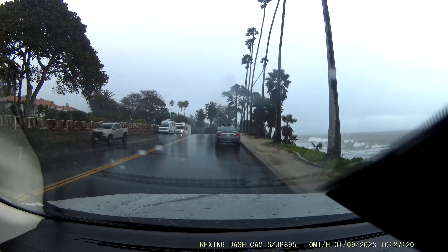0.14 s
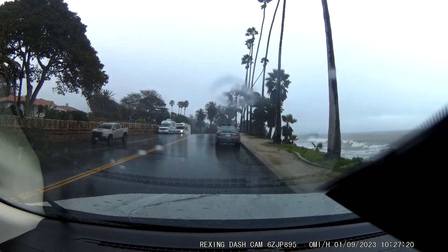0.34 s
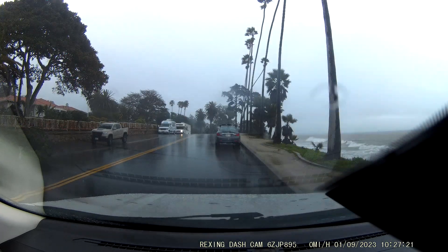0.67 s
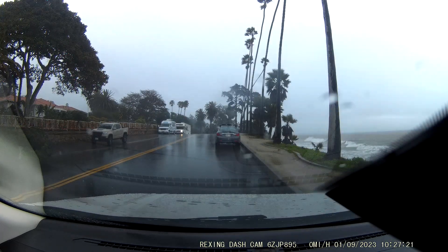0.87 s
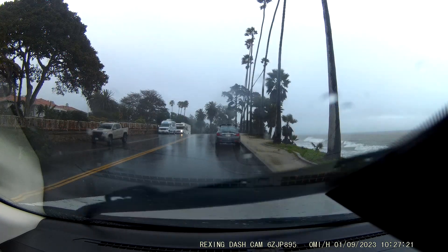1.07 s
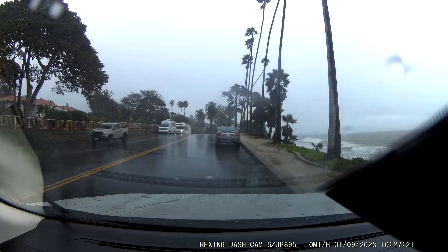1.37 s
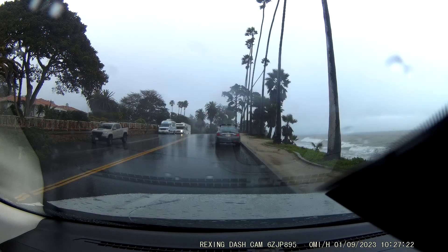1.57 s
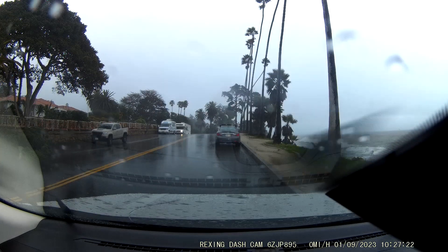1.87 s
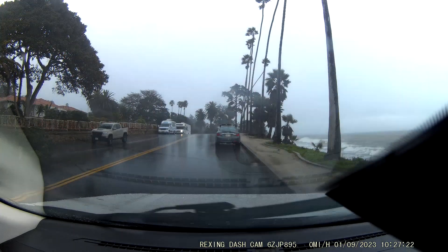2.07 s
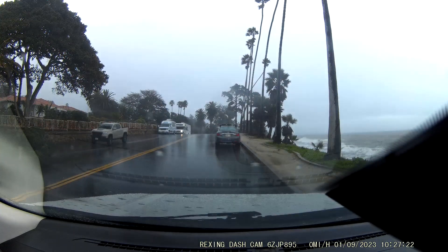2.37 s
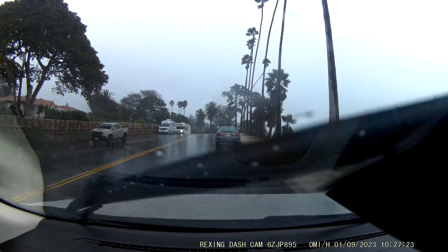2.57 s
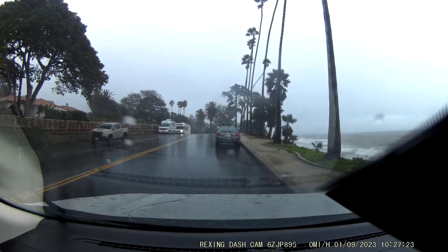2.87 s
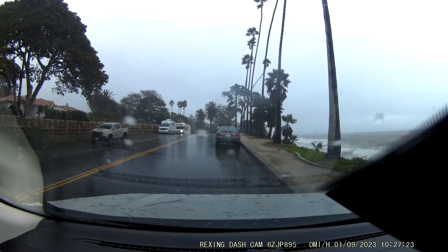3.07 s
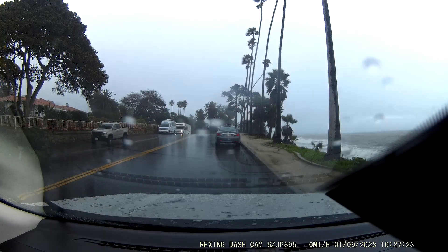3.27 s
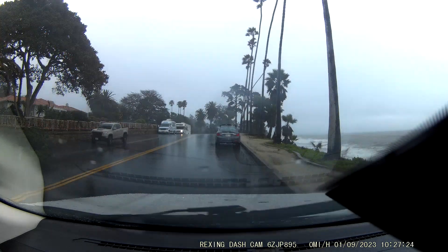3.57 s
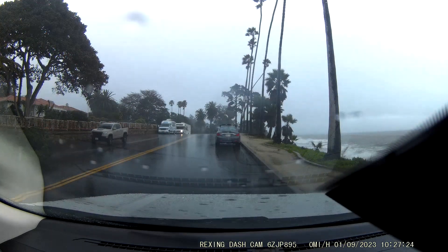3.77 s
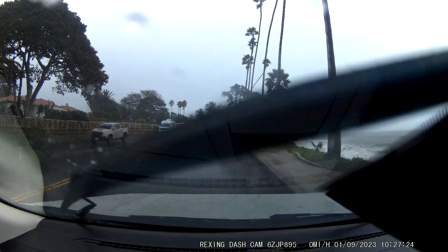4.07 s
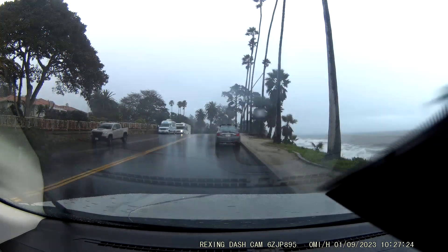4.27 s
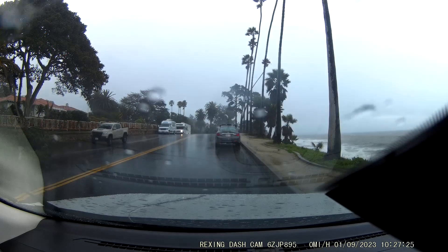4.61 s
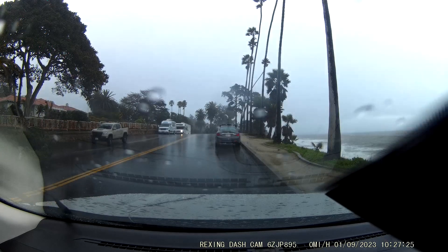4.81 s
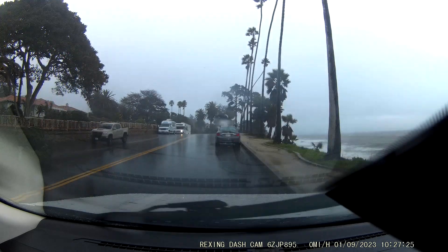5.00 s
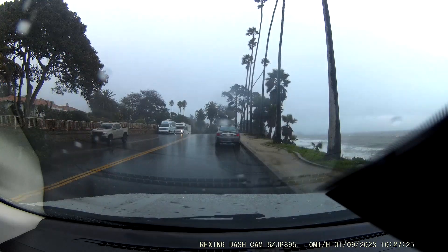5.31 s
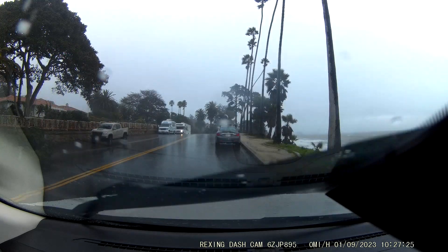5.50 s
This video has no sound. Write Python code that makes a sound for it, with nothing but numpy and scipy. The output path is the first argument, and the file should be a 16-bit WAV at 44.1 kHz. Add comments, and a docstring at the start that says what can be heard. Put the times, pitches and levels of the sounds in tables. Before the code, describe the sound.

Inside an idling car in rain, drops tick on the windscreen over a deep engine hum while wipers knock and softly flop.

```python
"""Inside an idling car in the rain: drops tick on the windscreen and patter on the roof, over a deep engine hum.
The wipers sweep about every 1.5 s with a faint motor whirr: they rub up the glass, knock at the top turn and
flop softly at the bottom. Now and then a fat drop splashes, thuds on the roof or rings a panel.
Rain, rubbing and hiss are filtered noise; hum and whirr are wavering sines; knocks are damped modes and bursts.
A bright hiss swells at the end."""
import sys
import numpy as np
from scipy import signal
from scipy.fft import rfft, irfft, next_fast_len
from scipy.io import wavfile
from scipy.ndimage import map_coordinates

SR = 44100
rng = np.random.default_rng(int(sys.argv[2]) if len(sys.argv) > 2 else 0)


def log_audio(samples):
    """Write samples as a 16-bit WAV file to the path given in sys.argv[1]."""
    # one column per channel
    frames = np.atleast_2d(samples).T
    # limit to full scale, then quantise
    limited = np.clip(frames, -1, 1)
    pcm = np.round(limited * 32767).astype(np.int16)
    wavfile.write(sys.argv[1], SR, pcm)


N = 249165  # length in samples

# How hard it rains. Each row: time in seconds, strength in dB.
RAIN_STRENGTH = [(0.0, -58.5), (0.28, -59.5), (1.41, -53.5), (2.01, -58), (2.5, -55.5), (4.04, -57),
                 (4.71, -54.5), (5.24, -57.5), (5.65, -54.5)]
# Spectra of a drop's tick on the glass, of water slapping the glass and of a dull thud.
# Each row: frequency in Hz, relative level in dB.
TICK_SPECTRUM = [(900, -4), (2300, -12), (2800, 2.5), (3200, 12.5), (4500, 0), (5000, -10), (5600, -8),
                 (7000, -21.5), (9000, -21), (15000, -32)]
SPLASH_SPECTRUM = [(300, -16), (800, -1), (1100, 5), (1600, -6), (2200, -15.5), (3200, -8.5), (5300, -16),
                   (7500, -27.5), (15000, -54)]
THUD_SPECTRUM = [(100, -7), (200, -7), (350, 6.5), (500, -8.5), (800, -18), (1500, -22), (4000, -45),
                 (15000, -65)]


def amp(db):
    """Decibels to gain."""
    return 10 ** (np.asarray(db) / 20)


def unit(x):
    """Scale to rms 1."""
    return x / np.sqrt(np.mean(x ** 2) + 1e-20)


def seconds(count):
    """A time axis in seconds."""
    return np.arange(count) / SR


def curves(rows):
    """One value per sample for each column after the time."""
    s, *cols = np.transpose(rows)
    return [np.interp(seconds(N), s, c) for c in cols]


def wobble(rate):
    """A smooth random curve through rate knots a second."""
    knots = rng.standard_normal(int(N * rate / SR) + 4)
    return map_coordinates(knots, [seconds(N) * rate])


def bump(s, width):
    """A bell-shaped swell of height 1 around time s."""
    return np.exp(-((seconds(N) - s) / width) ** 2)


def colour(x, spectrum):
    """Causal minimum-phase filter through the given (Hz, dB) points, made by folding the cepstrum."""
    size = 2 * next_fast_len(len(x) // 2 + 4096)
    hz, db = np.transpose(spectrum)
    log_hz = np.log(np.fft.rfftfreq(size, 1 / SR) + 1)
    gain = amp(np.interp(log_hz, np.log(hz), db))
    cepstrum = irfft(np.log(gain))
    cepstrum[1:size // 2] *= 2
    cepstrum[size // 2 + 1:] = 0
    response = np.exp(rfft(cepstrum))
    return irfft(rfft(x, size) * response)[:len(x)]


def noise(spectrum, count=N):
    """Coloured noise of rms 1."""
    return unit(colour(rng.standard_normal(count), spectrum))


def add(track, s, sound):
    """Mix a sound into a track at time s."""
    room = track[max(round(s * SR), 0):][:len(sound)]
    room += sound[:len(room)]


def ring(modes, attack):
    """Damped sine modes (Hz, dB, t60 in s), struck at slightly new strengths each time."""
    t = seconds(SR // 2)
    tones = np.zeros(len(t))
    for hz, db, t60 in modes:
        strike_db = db + .5 * rng.standard_normal()
        tones += amp(strike_db - 60 * t / t60) * np.sin(2 * np.pi * hz * t)
    return tones * (1 - np.exp(-t / attack))


def splat(spectrum, t60, wet):
    """An impact of peak 1: a sharp click and a short fizz of bursting water."""
    t = seconds(SR // 20)
    force = rng.standard_normal(len(t)) * amp(-60 * t / t60)
    force *= wet / np.linalg.norm(force)
    force[0] += 1  # the click
    burst = colour(force, spectrum)
    return burst / np.abs(burst).max()


def shower(spectrum, rate, spread_db, t60):
    """Countless random splats, mostly small, of rms 1: noise follows the summed power of their decays."""
    falls = rng.random(N) < rate / SR
    sizes = amp(spread_db * np.minimum(rng.exponential(size=N), 4.5))
    decay = amp(-60 * seconds(SR // 10) / t60)
    power = signal.fftconvolve(falls * sizes ** 2, decay ** 2)[:N]
    return unit(colour(np.sqrt(np.abs(power)) * rng.standard_normal(N), spectrum))


def clicks(spectrum, rate, spread_db):
    """Separate clean clicks at random moments and sizes, of rms 1."""
    falls = rng.random(N) < rate / SR
    sizes = amp(spread_db * np.clip(rng.standard_normal(N), -2, 1.5))
    return unit(colour(falls * sizes, spectrum))


def engine():
    """The idle's firing tone, a wavering sine, fills the cabin over a soft rumble of low noise."""
    # Each row: frequency in Hz, relative level in dB.
    rumble_spectrum = [(15, -4), (30, 3), (45, -4.5), (65, 0.5), (110, -7), (200, -9), (270, -15.5),
                       (500, -26), (1500, -60), (15000, -101)]
    firing_hz, waver_db, heave_db = 30.02, .6, 1.3
    phase = 2 * np.pi * np.cumsum(firing_hz + 0.099 * wobble(3.0)) / SR
    hum = amp(-37.5 + waver_db * wobble(5.25)) * np.sin(phase)
    rumble = amp(-46 + heave_db * wobble(4.62)) * noise(rumble_spectrum)
    return hum + rumble


def late_hiss():
    """A bright hiss, coloured noise, swells at the end and then holds its level."""
    # Each row: frequency in Hz, relative level in dB.
    hiss_spectrum = [(2000, -12), (4500, 11), (7000, -3), (10500, 0), (15000, -19)]
    top_s, top_db, rise_db_per_s = 5.64, -55.5, 120
    level_db = top_db + rise_db_per_s * np.minimum(seconds(N) - top_s, 0)
    return amp(level_db) * noise(hiss_spectrum)


def rain():
    """One strength drives fine patter and ticks on the glass and duller drumming through the lined roof."""
    # Fine patter on the glass, drumming on the roof. Each row: frequency in Hz, relative level in dB.
    patter_spectrum = [(700, -14), (1500, 4.5), (2200, -2.5), (2700, 0), (3200, -2), (4200, -4.5),
                       (4900, -4), (5500, -2.5), (7000, -15.5), (8300, -15.5), (10000, -19.5),
                       (15000, -27.5)]
    drumming_spectrum = [(150, -10.5), (300, 1), (375, 4.5), (450, -3), (540, 1), (680, 3.5), (900, 2),
                         (1100, -3), (1550, -10.5), (2100, -22), (4000, -37.5)]
    patter_db, fine_ticks_db = 1, -9  # re the rain's strength
    mean_roof_db, roof_follows, roof_waver_db = -47.8, .25, 0.55  # the roof takes a share of the rain's swings
    rain_db, = curves(RAIN_STRENGTH)
    roof_db = mean_roof_db + roof_follows * (rain_db - rain_db.mean()) + roof_waver_db * wobble(3.93)
    patter = amp(rain_db + patter_db) * shower(patter_spectrum, rate=2500, spread_db=2.5, t60=0.012)
    ticks = amp(rain_db + fine_ticks_db) * clicks(TICK_SPECTRUM, rate=60, spread_db=3.5)
    roof = amp(roof_db) * shower(drumming_spectrum, rate=700, spread_db=0.5, t60=0.052)
    return patter + ticks + roof


def drop(db, body_db):
    """One drop on the windscreen: a bright tick over a duller body, both short splats."""
    # The duller body. Each row: frequency in Hz, relative level in dB.
    body_spectrum = [(300, -20), (850, 4), (1600, 8), (2100, -4.5), (2700, -0.5), (5000, -28), (7000, -27),
                     (15000, -31)]
    tick_trim_db, body_trim_db = -0.5, 7  # added to the two parts of every drop
    pitch = rng.uniform(.96, 1.1)  # each tick is pitched slightly differently, at random
    tick_spectrum = np.multiply(TICK_SPECTRUM, [pitch, 1])
    tick = amp(tick_trim_db) * splat(tick_spectrum, t60=0.011, wet=.35)
    body = amp(body_db + body_trim_db) * splat(body_spectrum, t60=0.013, wet=0.61)
    return amp(db) * (tick + body)


def small_drops():
    """Smaller drops hit the windscreen at random, harder when the rain is stronger."""
    per_s, mean_db, spread_db, body_db = 8, -41.5, 3.5, -11
    out = np.zeros(N)
    rain_db, = curves(RAIN_STRENGTH)
    for place, size in rng.random((round(per_s * N / SR), 2)):
        swing_db = rain_db[int(place * N)] - rain_db.mean()
        db = mean_db + spread_db * (2 * size - 1) + .5 * swing_db
        add(out, place * N / SR, drop(db, body_db))
    return out


def near_drops():
    """Large drops tick on the windscreen, ring a panel's modes, splash, or thud on the roof."""
    # The largest drops on the glass, each heard 1 ms after its listed time.
    # Each row: time in seconds, drop level in dB, body in dB re that level, before the trims in drop().
    large_drops = [(0.1715, -37, -8), (0.2992, -39, -12), (0.3135, -38, -13), (1.1867, -29, -8.5),
                   (1.278, -37, -20), (1.646, -35, -12), (1.9107, -37.5, -11), (2.3236, -35, -14),
                   (2.454, -38, -11), (2.799, -37, -15), (3.061, -35, -15), (3.175, -37.5, -13),
                   (3.2873, -35, -17), (3.5578, -34, -14), (3.968, -35.5, -6), (4.0248, -36.5, -10),
                   (4.6893, -37, -12), (4.7366, -35.5, -13), (4.9697, -38, -10), (5.114, -36.5, -8),
                   (5.126, -36, -13), (5.2367, -39, -9), (5.2614, -35, -8)]
    # Fat drops ringing a panel. Each row: start in seconds, level in dB.
    plops = [(4.3288, -41), (4.3332, -35.5)]
    # The panel's modes. Each row: frequency in Hz, level in dB, 60 dB decay time in seconds.
    panel_modes = [(1230, 4.5, 0.064), (1334, -2, 0.067), (1390, -4, 0.064), (1530, -16, 0.13)]
    # Heavy drips on the lined roof. Each row: start in seconds, peak level in dB.
    roof_drips = [(0.081, -36), (0.649, -38.5), (2.547, -39), (5.063, -36)]
    # Water slapping the glass. Each row: centre in seconds, level in dB.
    splashes = [(3.042, -48), (3.061, -39.5)]
    out = np.zeros(N)
    for s, db, body_db in large_drops:
        add(out, s + 0.00099, drop(db, body_db))
    for s, db in plops:
        add(out, s, amp(db) * ring(panel_modes, attack=0.00018))
    for s, db in roof_drips:
        add(out, s, amp(db) * splat(THUD_SPECTRUM, t60=0.14, wet=1.5))
    slaps = sum(amp(db) * bump(s, width=0.0078) for s, db in splashes)
    return out + slaps * noise(SPLASH_SPECTRUM)


def wiper_motor():
    """A rough gear whirr: a sine that wanders a little in pitch and level, roughened by fast wobbles."""
    motor_hz, wander_hz, level_db, waver_db = 804, 10, -55, 1.6
    phase = 2 * np.pi * np.cumsum(motor_hz + wander_hz * wobble(8)) / SR
    whirr = unit((0.69 + wobble(50)) * np.sin(phase) + wobble(50) * np.cos(phase))
    return amp(level_db + waver_db * wobble(5.2)) * whirr


def thump(hz, width):
    """A soft push on the glass, a cycle or two long; it sinks in pitch to hz as the rubber settles."""
    u = seconds(SR // 5) / width
    phase = 2 * np.pi * hz * width * (u + 2 * (1 - np.exp(-u)))
    return u ** 2 * np.exp(2 - 2 * u) * np.sin(phase)


def wiper_flops():
    """At the bottom the wet blades tap, scuff and flop over, rest, and shudder as they set off again."""
    # Blades flopping over. Each row: start in seconds, first tap in dB, restart shake in dB.
    flops = [(0.879, -34, -40), (2.342, -32, -39), (3.8238, -26, -42), (5.296, -33, -38.5)]
    # Rubber scuffing the glass, arms shuddering. Each row: frequency in Hz, relative level in dB.
    scuff_spectrum = [(70, -9), (170, 10), (270, 0.5), (370, 4.5), (460, -3.5), (560, -1.5), (800, -12.5),
                      (1150, -8.5), (1700, -21), (5000, -37), (15000, -56)]
    shudder_spectrum = [(35, -16), (55, -2), (80, 2), (110, -9), (200, -18), (400, -32), (2000, -73)]
    flop_lag_s, scuff_db, scuff_width_s = 0.0182, -35, 0.019  # the scuff and thump follow the tap
    thump_db, shake_db, shake_lag_s, shake_width_s = -26, -38.5, .05, 0.072  # the arms land and shake
    rest_s, restart_width_s = .205, 0.07  # the arms rest, then set off again
    restart_thump_db, restart_rub_db = 3.5, -9.5  # re the restart's shake
    out, rub, shake = np.zeros(N), np.zeros(N), np.zeros(N)
    for s, tap_db, restart_db in flops:
        add(out, s, amp(tap_db) * splat(scuff_spectrum, t60=0.057, wet=0.58))
        add(out, s + flop_lag_s, amp(thump_db) * thump(hz=43.5, width=0.015))
        restart_thump = amp(restart_db + restart_thump_db) * thump(hz=47.9, width=0.0195)
        add(out, s + rest_s - .02, restart_thump)
        restart = amp(restart_db) * bump(s + rest_s, restart_width_s)
        rub += amp(scuff_db) * bump(s + flop_lag_s, scuff_width_s)
        rub += amp(restart_rub_db) * restart
        shake += amp(shake_db) * bump(s + shake_lag_s, shake_width_s) + restart
    return out + rub * noise(scuff_spectrum) + shake * noise(shudder_spectrum)


def rattle():
    """The loose wiper arm rattles: a rough burst of coloured noise that dies away."""
    # Each row: frequency in Hz, relative level in dB.
    arm_spectrum = [(100, -12), (200, -2), (270, -18), (355, 5), (450, -11), (800, -11), (1400, -17.5),
                    (2500, -31), (15000, -62)]
    t = seconds(SR // 4)
    return amp(-60 * t / 0.27) * noise(arm_spectrum, count=len(t))


def wiper_knocks():
    """The blades rub over the upper glass, then slap over at the turn, ring the screen, bounce and rattle."""
    # Blade knocks at the top of the sweep. Each row: start in seconds, level in dB.
    knocks = [(0.1847, -18), (1.6617, -18), (3.1310, -20), (4.604, -19.5)]
    # Windscreen and cabin modes. Each row: frequency in Hz, level in dB, 60 dB decay time in seconds.
    screen_modes = [(57, -16, 0.38), (77.4, -18, 0.34), (109, -10, 0.25), (159.8, -3.5, 0.19),
                    (182.3, 2, 0.1), (218, -11.5, 0.17), (313.5, 0.5, 0.093), (345.5, -14, 0.31),
                    (406, -29, 0.09), (566, -0.5, 0.051), (744, -6.5, 0.03), (970, -17, 0.029),
                    (1250, -18, 0.036), (1600, -27, 0.02)]
    # The blade's hard spine on the glass, its rubber dragging. Each row: frequency in Hz, relative level in dB.
    crack_spectrum = [(500, -26), (1400, -7), (1700, 1), (2000, 0), (2800, -4), (4200, -11), (5400, -6.5),
                      (7000, -20), (15000, -35)]
    judder_spectrum = [(60, -18.5), (150, 4.5), (260, -7.5), (360, -3.5), (480, -17.5), (800, -13.5),
                       (1500, -40), (4000, -48), (15000, -59)]
    judder_db, judder_lead_s, judder_width_s = -42, .13, .11  # rubber dragging before each knock
    lip_db, lip_lead_s, lip_width_s = -38, 0.0046, 0.019  # its lip rolling over just before the slap
    slap_db, crack_db, bounce_db, rattle_db = -17.5, -18, -17, -26.5  # re the knock
    bounce_lag_s, rattle_lag_s = .04, .014
    out, rub = np.zeros(N), np.zeros(N)
    for s, db in knocks:
        add(out, s, amp(db) * ring(screen_modes, attack=.0011))
        add(out, s + 0.000938, amp(db + slap_db) * splat(SPLASH_SPECTRUM, t60=0.055, wet=2.7))
        add(out, s + 0.002014, amp(db + crack_db) * splat(crack_spectrum, t60=0.028, wet=2.7))
        add(out, s + bounce_lag_s, amp(db + bounce_db) * splat(THUD_SPECTRUM, t60=0.14, wet=2.9))
        add(out, s + rattle_lag_s, amp(db + rattle_db) * rattle())
        rub += amp(judder_db) * bump(s - judder_lead_s, judder_width_s)
        rub += amp(lip_db) * bump(s - lip_lead_s, lip_width_s)
    return out + rub * noise(judder_spectrum)


def scene():
    """Everything heard in the cabin, as one channel."""
    background = engine() + late_hiss() + rain()
    drops = small_drops() + near_drops()
    wipers = wiper_motor() + wiper_flops() + wiper_knocks()
    return (background + drops + wipers)[None]


def record(dry):
    """The dashboard camera's microphone adds hiss and a thin electronic whine, and cuts all above its band."""
    # The microphone's hiss. Each row: frequency in Hz, relative level in dB.
    hiss_spectrum = [(1000, 1), (3000, 3.5), (6000, 0.5), (9000, -5), (13000, -4), (14800, -13),
                     (15700, -5.5)]
    whine_hz, top_hz = 14422.5, 15700
    phase = 2 * np.pi * np.cumsum(whine_hz + 3 * wobble(20)) / SR
    whine = amp(-82.5) * np.sin(phase)
    x = dry + whine + amp(-64) * noise(hiss_spectrum)
    size = next_fast_len(N + 8192)
    in_band = np.fft.rfftfreq(size, 1 / SR) < top_hz
    return irfft(rfft(x, size) * in_band, size)[:, :N]


dry = scene()
out = record(dry)
log_audio(out)
```